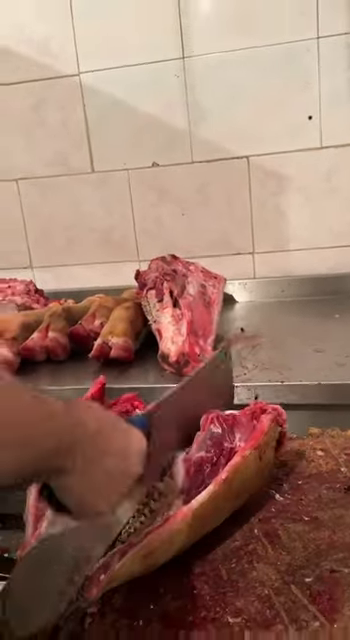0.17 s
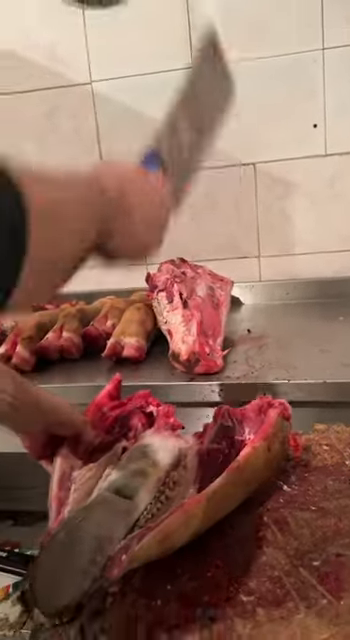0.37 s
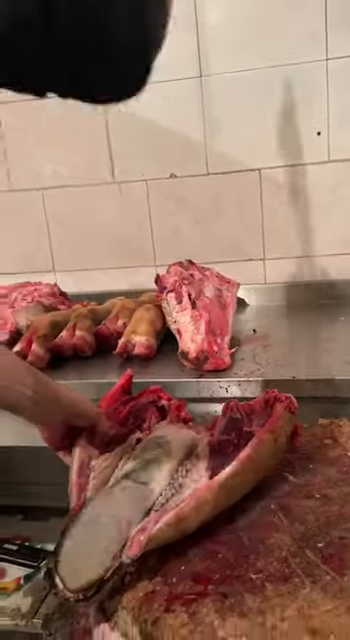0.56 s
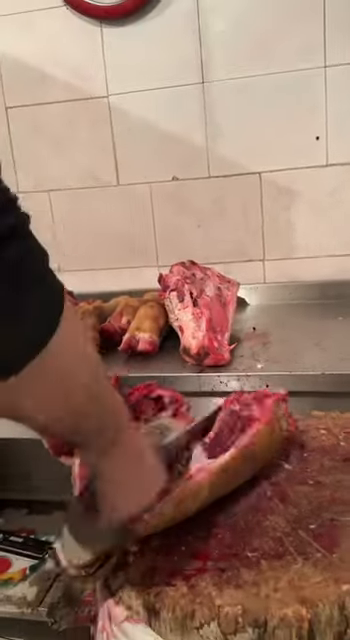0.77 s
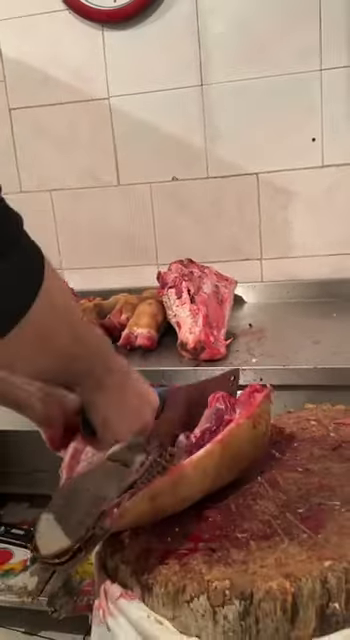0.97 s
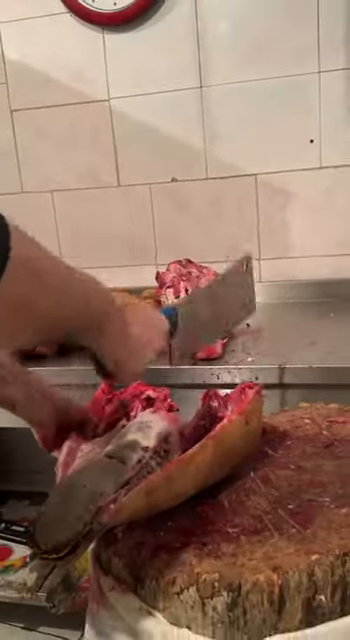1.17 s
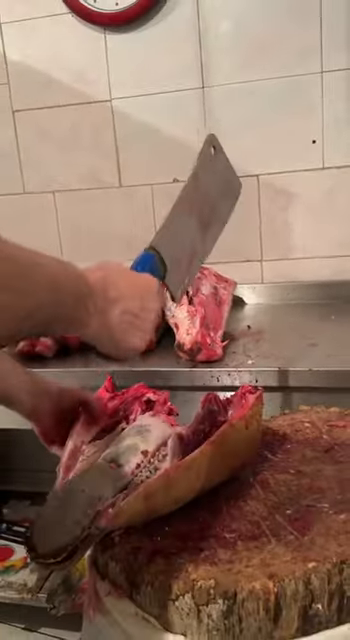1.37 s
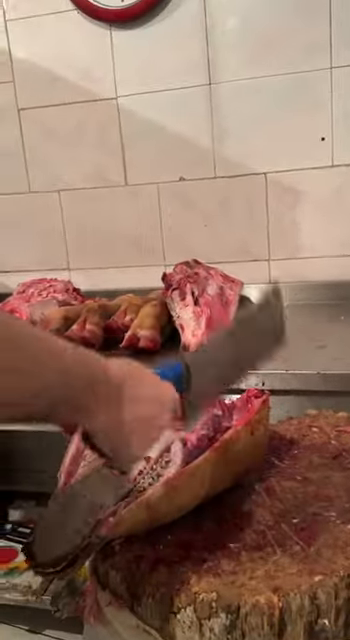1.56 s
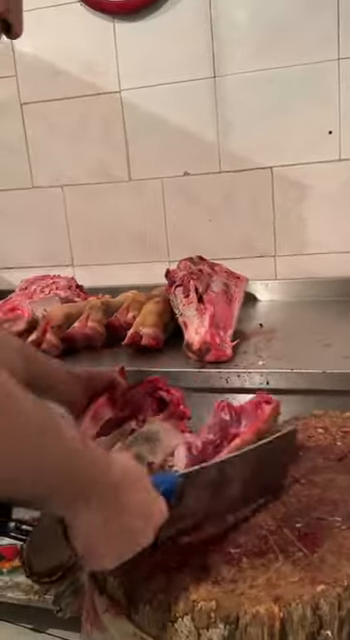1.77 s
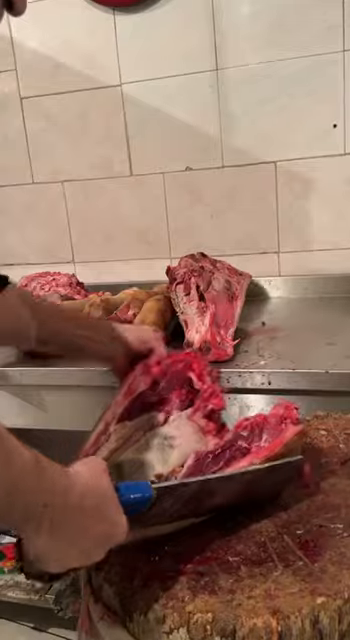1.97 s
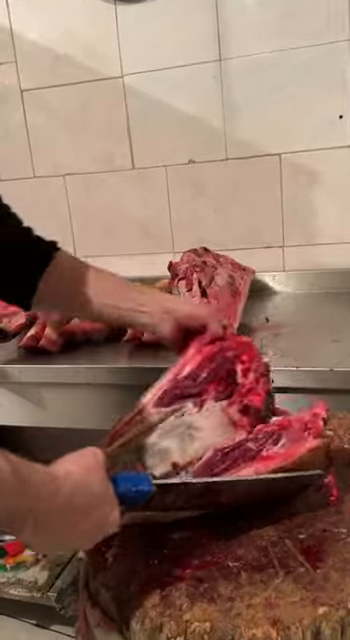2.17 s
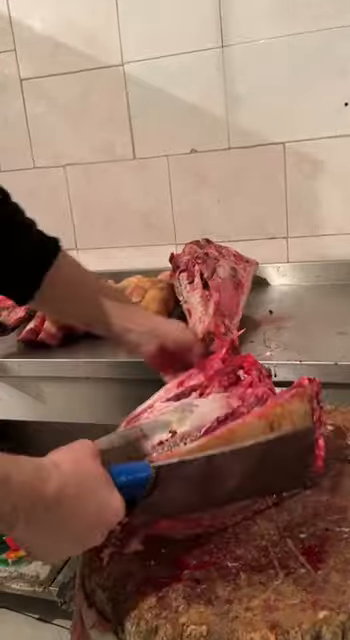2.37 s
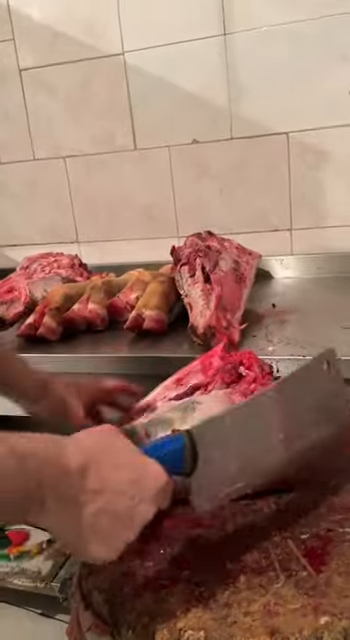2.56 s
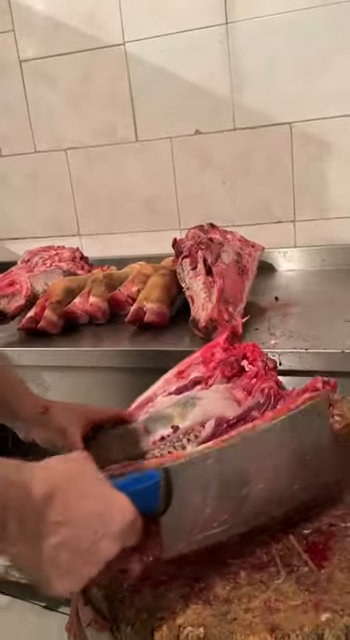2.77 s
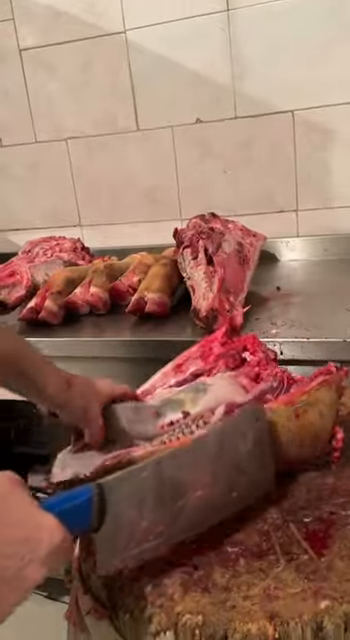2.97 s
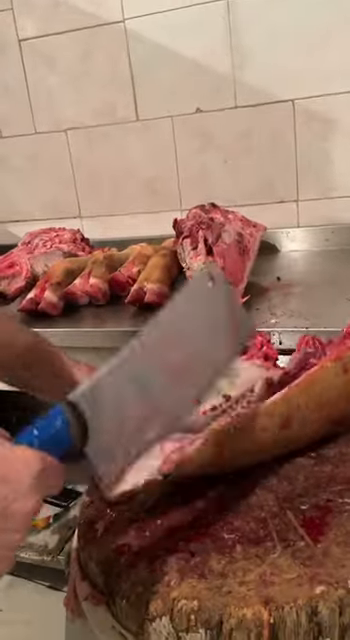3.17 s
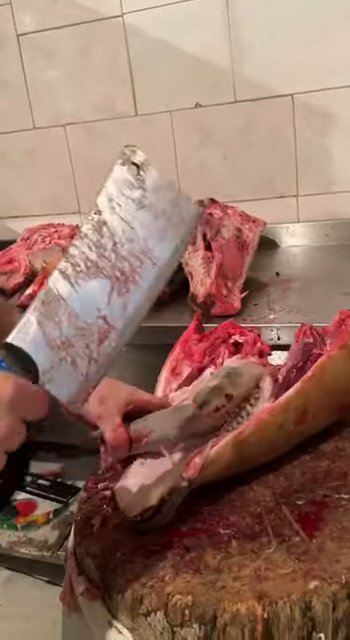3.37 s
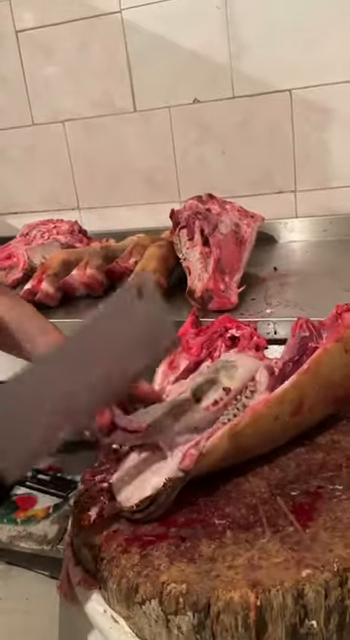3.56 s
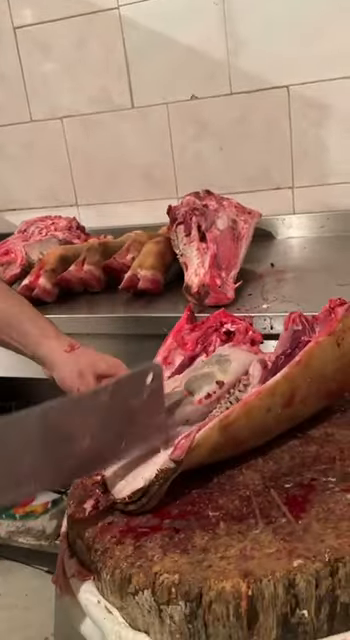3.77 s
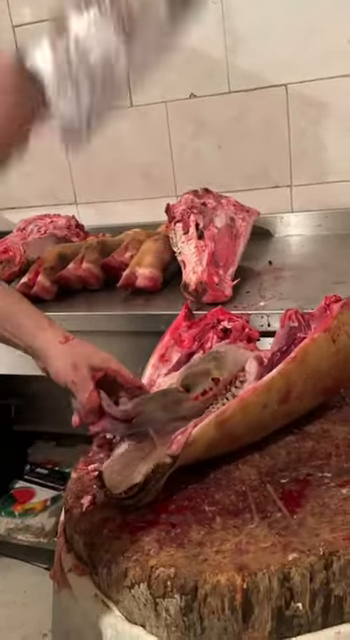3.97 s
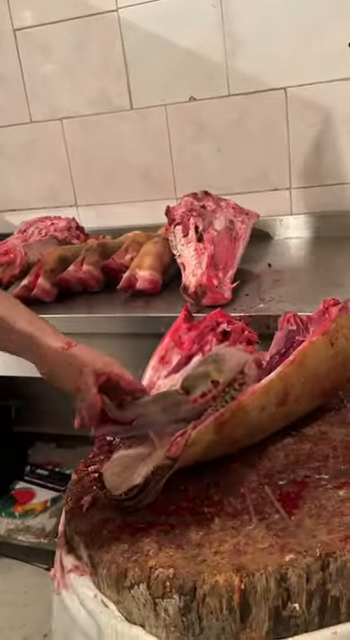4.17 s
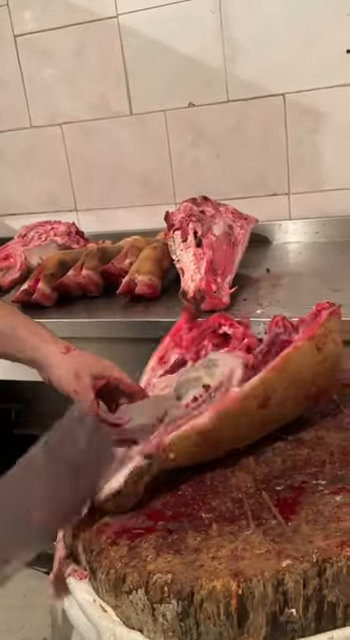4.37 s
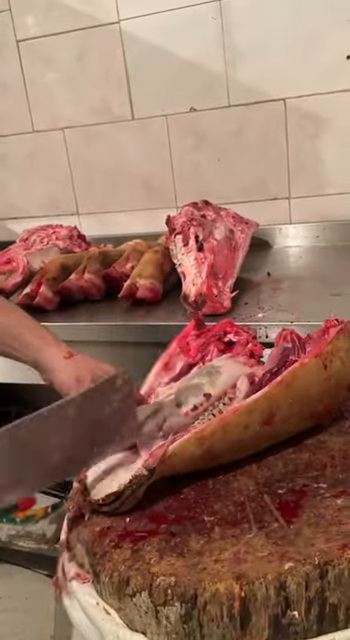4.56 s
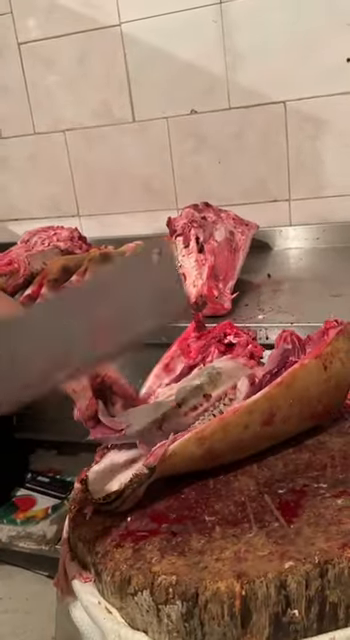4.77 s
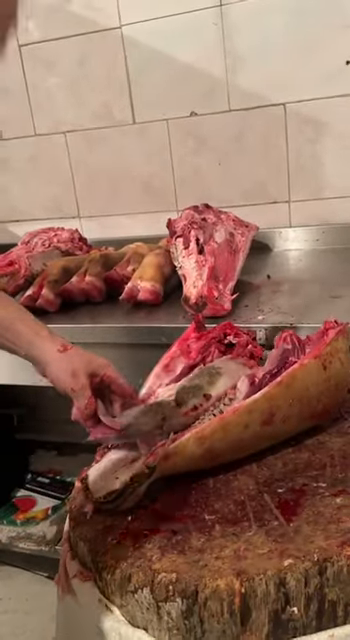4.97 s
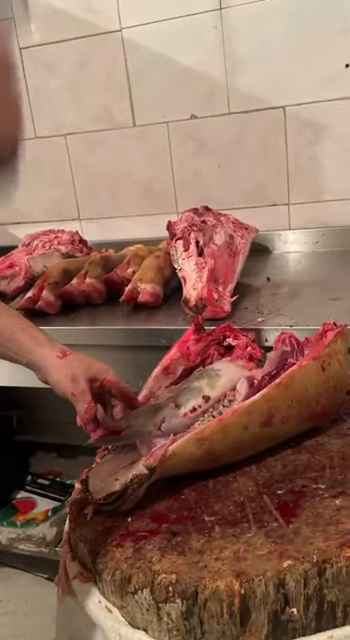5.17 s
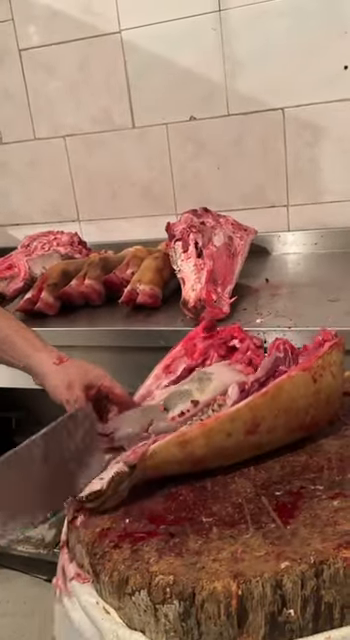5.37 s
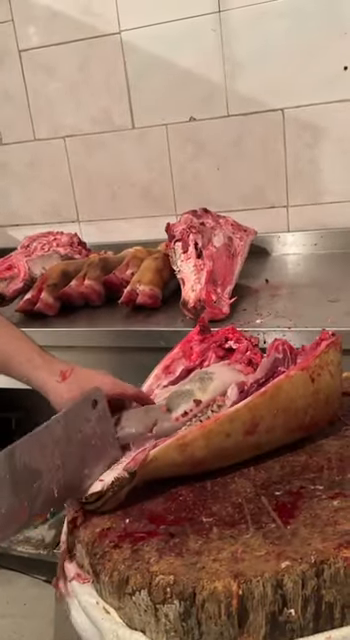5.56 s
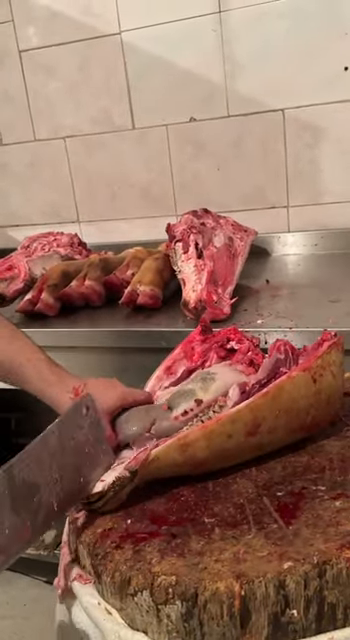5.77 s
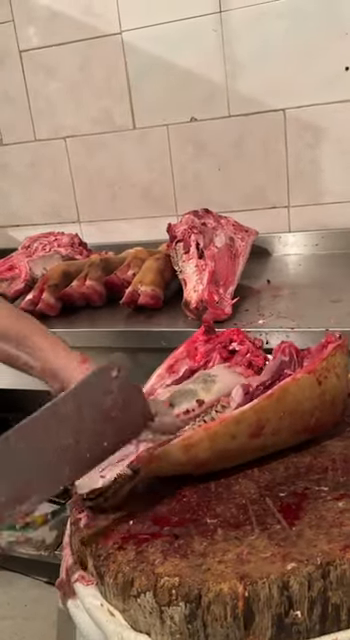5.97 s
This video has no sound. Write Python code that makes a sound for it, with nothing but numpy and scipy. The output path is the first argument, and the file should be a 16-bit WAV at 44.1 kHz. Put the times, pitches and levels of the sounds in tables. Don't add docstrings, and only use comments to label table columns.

```python
import sys
import numpy as np
from scipy import signal
from scipy.fft import rfft, irfft, next_fast_len
from scipy.io import wavfile
from scipy.ndimage import uniform_filter1d, map_coordinates

SR = 44100
rng = np.random.default_rng(int(sys.argv[2]) if len(sys.argv) > 2 else 0)


def volts_from_db(level):
    exponent = np.asarray(level, float) / 20
    return 10 ** exponent


def materialize(psi):
    bounded = np.clip(np.atleast_2d(psi).T, -1, 1)
    quanta = np.round(bounded * 32767).astype(np.int16)
    wavfile.write(sys.argv[1], SR, quanta)


N = 265482

# (time [s], peak level [dB],
# ring [Hz], second ring [Hz], t60 [s])
BONE_CONTACTS = [(.0869, -4.5, 2480, 6840, .01), (0.0862, -3.5, 3550, 5500, .015),
                 (.0881, -9.5, 940, 4300, .025), (0.099, -16, 1260, 3260, .05),
                 (.7696, -5, 1230, 2500, .027), (0.7701, 0.5, 1576, 5320, .018),
                 (.7707, -5.5, 2880, 7100, .013), (.787, -16.5, 2830, 5130, .037),
                 (3.6666, -12, 1645, 6090, 0.018), (3.6672, -14.5, 2400, 4790, .021),
                 (3.6673, -8, 952, 7320, .014), (3.667, -14, 9300, 11200, .013),
                 (4.34, -0.5, 2500, 5100, .0065), (4.3404, -21, 3190, 1500, .026),
                 (4.3449, -15, 1020, 3570, .012), (4.3486, -15, 1540, 5570, .0077),
                 (5.2459, -3, 2842, 5180, .018), (5.246, -6.5, 1668, 1090, .021),
                 (5.2536, -19.5, 905, 4040, .0084), (5.2545, -3.5, 1780, 9600, .021)]
# (time [s], room answer [dB], thud [dB], ring [dB], delay until the edge stops [s])
BLOWS = [
    (0.0864, -30.5, -20.5, -27, 0.0026),
    (.770, -22, -19.5, -25.5, .004),
    (3.667, -37, -15.5, -37.5, 0.0034),
    (4.341, -16.5, -20.5, -18, .008),
    (5.246, -14.5, -11.5, -18.5, .0071),
]
# (time [s], peak level [dB], pitch [Hz], room relative to tick [dB])
MEAT_TICKS = [(1.169, -33, 8600, -15), (1.7412, -30, 4370, -13), (1.741, -38, 1500, -4),
              (1.8065, -35, 7000, -14), (1.8065, -34, 11100, -20), (1.8285, -35, 950, -9),
              (1.8281, -28.5, 6000, -15), (1.828, -36, 2410, -8), (1.887, -42.5, 2500, 1),
              (2.0217, -11.5, 5630, -21.5), (2.0226, -25, 4200, -17), (2.028, -28, 6230, -19),
              (2.0445, -29, 5100, -20), (2.112, -39, 9050, -10), (2.148, -39, 4300, -3),
              (2.178, -42.5, 4550, -0.5), (2.206, -35, 4200, -11), (2.313, -40, 4020, -2),
              (2.363, -32, 10400, -18), (2.377, -32, 6500, -16), (2.388, -39, 5940, -15),
              (2.7977, -32.5, 5450, -6.5), (2.8625, -36, 6760, -10), (3.281, -35, 5600, -4.5),
              (3.433, -36, 5100, -5)]
# (time [s], table jolt [dB], gain dip [dB], gain hold [s], skull note [Hz])
HARDEST_BLOWS = [
    (4.354, -13.5, -9, 0.14, 1573),
    (5.252, -6.5, -16.5, 1.2, 1610),
]


def unit(x):
    return x / np.sqrt(np.mean(x ** 2) + 1e-20)


def along(points, hz):
    f, v = np.transpose(points)
    return np.interp(np.log(hz + 1), np.log(f + 1), v)


def wobble(rate_hz):
    knots = rng.standard_normal(int(N * rate_hz / SR) + 4)
    return map_coordinates(knots, [np.arange(N) * rate_hz / SR])


def filtered(x, response):
    m = next_fast_len(x.shape[-1] + 8192)
    spectrum = rfft(x, m) * response(np.fft.rfftfreq(m, 1 / SR))
    return irfft(spectrum, m)[..., :x.shape[-1]]


def resonances(modes):
    return lambda f: sum(volts_from_db(db) * 1j * f * w / (c * c - f * f + 1j * f * w) for c, w, db in modes)


def diffuse(pair, response):
    # (frequency [Hz], left-right correlation [0-1])
    likeness = [(60, .9995), (200, 1), (350, 0.99), (640, 0.66), (1160, 0.4), (2090, .65), (3780, 0.37),
                (5500, 0.28), (6000, 1), (12000, 0.98)]
    turn = lambda hz: np.arccos(np.clip(along(likeness, hz), -1, 1)) / 2
    mid, side = filtered(pair, lambda hz: response(hz) * [np.cos(turn(hz)), np.sin(turn(hz))])
    return unit(np.array([mid + side, mid - side]))


def add(track, s, sound):
    part = track[..., round(s * SR):][..., :sound.shape[-1]]
    part += sound[..., :part.shape[-1]]


def ring(hz, t60, t, attack):
    return np.sin(2 * np.pi * hz * t) * volts_from_db(-60 * t / t60) * (1 - np.exp(-t / attack))


def walls(response, t60_share, rise):
    # (frequency [Hz], t60 [s])
    room_t60 = [(300, 0.49), (1000, 0.61), (3000, 0.61), (6000, 0.56), (11000, 0.64)]
    t = np.arange(SR) / SR
    hz, frames_s, z = signal.stft(diffuse(rng.standard_normal((2, SR)), response), SR, nperseg=256)
    decay = volts_from_db(-60 * frames_s / (t60_share * along(room_t60, hz)[:, None]))
    tail = signal.istft(z * decay, SR, nperseg=256)[1][:, :SR]
    echoes_db = 2.4 * map_coordinates(rng.standard_normal(400), [260 * t]) * np.exp(-t / .12)
    return tail * volts_from_db(echoes_db) * (1 - np.exp(-t / rise))


def thud(t, cushion_db):
    # (frequency [Hz], level [dB], t60 [s])
    block_modes = [(62.3, -7.5, 0.14), (106.7, -4.5, 0.23), (207, 5, 0.061), (398.6, -1, 0.059),
                   (537, 1.5, 0.039)]
    out = np.zeros(len(t))
    for hz, db, t60 in block_modes:
        mode_db = db - cushion_db * np.log2(hz / 200) + rng.normal(0, 1.5)
        out += volts_from_db(mode_db) * ring(hz, t60, t, attack=0.0041)
    return out


def machines():
    # (frequency [Hz], density [dB per Hz])
    fan_colour = [(13, -47), (25, -19), (44, -4), (122, -7.5), (250, -9), (500, -11), (714, -15.5),
                  (900, -20.5), (1750, -26), (1950, -29.5), (4600, -36.5), (5500, -36.5), (8520, -38),
                  (10500, -44.5), (12500, -41.5)]
    # (frequency [Hz], width [Hz], level [dB])
    compressor_tones = [(56.3, 9.1, -45.5), (153.5, 18, -47.5), (197.33, 6, -44.5), (215.3, 3.3, -45.5),
                        (319.5, 5, -46.5), (391.8, 6.1, -56.5), (474.3, 7.5, -53.5), (601.3, 18, -54),
                        (694.3, 20, -57)]
    fan = diffuse(rng.standard_normal((2, N)), lambda hz: volts_from_db(along(fan_colour, hz)))
    air = volts_from_db(-38 + 0.4 * wobble(4)) * fan
    for hz, width_hz, db in compressor_tones:
        band = resonances([(hz, width_hz, 0)])
        tone = diffuse(rng.standard_normal((2, N)), lambda f: band(f) ** 2)
        air += volts_from_db(db + 1.6 * wobble(3.59)) * tone
    return air


def slices():
    # (start [s], end [s], level [dB], centre [Hz])
    flesh_cuts = [
        (.0778, .0872, -32, 3300),
        (.7615, .771, -27, 2700),
        (4.3365, 4.341, -34, 2200),
        (5.239, 5.247, -33, 4200),
    ]
    near, t = np.zeros((2, N)), np.arange(SR // 20) / SR
    for start, end, db, hz in flesh_cuts:
        band = resonances([(hz, 1.6 * hz, 0)])
        hiss = unit(filtered(rng.standard_normal(len(t)), lambda f: band(f) ** 2))
        add(near, start, volts_from_db(db) * (t < end - start) * hiss)
    return near


def contacts():
    near, t = np.zeros((2, N)), np.arange(SR // 20) / SR
    for s, db, low_hz, high_hz, t60 in BONE_CONTACTS:
        crack_db = -6.5 - 5.5 * np.log2(t60 / .012) - db
        splinters = rng.standard_normal((3, len(t)))
        rough = 1 + 1.1 * uniform_filter1d(splinters[2], size=14)
        crack = filtered(splinters, resonances([(high_hz, 1.8 * high_hz, 2)]))
        crack *= volts_from_db(-60 * t / (.8 * t60)) * (1 - np.exp(-t / 4e-4))
        body = ring(low_hz, t60, t, attack=7e-4) * rough
        high_ring = ring(high_hz, 0.73 * t60, t, attack=0.0003) * rough
        body += volts_from_db(crack_db) * (high_ring + 0.79 * crack[0])
        side = volts_from_db(crack_db - 12.5) * np.outer([1, -1], crack[1])
        add(near, s, volts_from_db(db - 2.5) * (body + side))
    return near


def chops():
    # (frequency [Hz], density [dB per Hz])
    colours = [
        [(290, -28.5), (500, 9), (1230, 1.5), (1530, -8), (3630, 1.5), (4610, -22.5), (5400, -4), (9570, -11),
         (10400, -42), (12000, -39)],
        [(290, -43), (500, -9.5), (886, -9), (1230, -4), (2100, -14), (2500, -11.5), (4430, -14), (7530, -12),
         (9200, -10.5), (12000, -40.5)],
        [(410, -21), (700, 4), (1500, -5.5), (1690, -3), (1920, -11.5), (2490, -5), (3840, -10), (5600, -7.5),
         (7420, -12), (8650, -20.5), (11600, -15.5), (15100, -50.5)],
        [(290, -10), (500, -4.5), (818, -6), (1470, -7), (2250, -10.5), (3480, -9.5), (4670, -15.5),
         (7530, -18.5), (10200, -24.5), (12000, -90)],
        [(290, -47), (500, -7.5), (745, -5), (874, -25), (934, -6), (1630, -4.5), (2530, -10), (7340, -12),
         (10800, -27.5), (12000, -88.5)],
    ]
    # (frequency [Hz], width [Hz], level [dB])
    blade_modes = [
        [(1230, 75, -6.5), (2360, 52, -5.5), (2500, 230, -8), (3500, 47, 2), (5380, 160, 2), (5400, 37, -1),
         (7150, 100, 2.5), (8000, 45, 0.5), (8600, 61, -5.5), (9300, 120, -5.5)],
        [(1290, 590, -2), (2490, 160, -4), (2905, 56, -6.5), (5100, 190, -2), (6080, 77, -3), (6750, 37, -8.5),
         (6530, 32, -8), (7430, 180, -25), (8700, 50, -10.5), (8950, 66, -14.5)],
        [(2500, 110, -7), (6100, 95, -2), (7500, 150, 1.5), (8220, 99, -8), (8700, 33, -12.5),
         (9400, 140, -7.5), (11200, 43, -9)],
        [(1480, 140, -5.5), (3630, 45, -9), (6270, 56, -19)],
        [(1060, 56, -4.5), (1700, 140, -5), (3410, 74, -9.5), (5300, 61, -7), (7130, 80, -8.5)],
    ]
    cushions = [0.8, -0.5, 0.6, -0.7, 2.5]
    after, t = np.zeros((2, N)), np.arange(SR) / SR
    for blow, colour, modes, cushion_db in zip(BLOWS, colours, blade_modes, cushions):
        s, room_db, thud_db, ring_db, delay_s = blow
        answer = volts_from_db(room_db) * walls(lambda hz: volts_from_db(along(colour, hz)), t60_share=1.138, rise=0.00067)
        answer += volts_from_db(ring_db) * walls(resonances(modes), t60_share=0.78, rise=0.0062)
        add(after, s + delay_s, answer)
        add(after, s + .003, volts_from_db(thud_db) * thud(t, cushion_db))
    return after


def ticks():
    dry_t60_s, chip_hz = 0.004, 3150
    out, t = np.zeros((2, N)), np.arange(SR // 2) / SR
    for s, db, hz, room_db in MEAT_TICKS:
        t60 = dry_t60_s * np.minimum(1 + (chip_hz / hz) ** 8, 8.5)
        snap = ring(hz, t60, t, attack=0.00022) * (0.68 + 1.13 * rng.standard_normal(len(t)))
        add(out, s, volts_from_db(db + 3.0) * filtered(snap, resonances([(hz, 1.05 * hz, 0)])))
        echo = walls(resonances([(hz, .6 * hz, 0)]), t60_share=0.54, rise=0.002)
        add(out, s + 0.0044, volts_from_db(db + room_db - 9.0) * echo)
    return out


def rubbing():
    # (time [s], peak level [dB], swell per 20 dB [s], fade per 20 dB [s])
    hand_strokes = [
        (1.3, -54, .07, .17),
        (1.93, -56.5, .25, .45),
        (2.8, -62, .5, .5),
        (3.25, -60, .4, .7),
        (4.78, -57, .15, .5),
    ]
    # (frequency [Hz], density [dB per Hz])
    wet_colour = [(2000, -68.5), (4000, -0.5), (7000, 7.5), (10000, 8.5), (13000, -24.5)]
    # (time [s], peak level [dB], swell per 20 dB [s], fade per 20 dB [s], centre [Hz])
    blade_slide = (3.14, -51, .45, .45, 2100)
    now = np.arange(N) / SR

    def stroke(s, db, swell_s, fade_s):
        return volts_from_db(db - 20 * np.maximum((s - now) / swell_s, (now - s) / fade_s))

    grain = volts_from_db(2.2 * wobble(300) + 1.8 * wobble(25))
    slide_hz = blade_slide[-1]
    band = resonances([(slide_hz, 1.4 * slide_hz, 0)])
    drag = diffuse(grain * rng.standard_normal((2, N)), lambda f: band(f) ** 2)
    rustle = diffuse(grain * rng.standard_normal((2, N)), lambda hz: volts_from_db(along(wet_colour, hz)))
    return sum(stroke(*row) for row in hand_strokes) * rustle + stroke(*blade_slide[:-1]) * drag


def bumps():
    # (time [s], level [dB])
    settlings = [
        (1.745, -26),
        (2.32, -33),
        (2.38, -26.5),
    ]
    out, t = np.zeros((2, N)), np.arange(SR // 2) / SR
    for s, db in settlings:
        add(out, s, volts_from_db(db) * thud(t, cushion_db=2.5))
    return out


def jolts():
    skull_db, skull_width_hz = -36, 89
    after, t = np.zeros((2, N)), np.arange(SR) / SR
    for s, jolt_db, dip_db, _, hz in HARDEST_BLOWS:
        skull = walls(resonances([(hz, skull_width_hz, 0)]), t60_share=1.23, rise=.006)
        add(after, s, volts_from_db(skull_db - 1.01 * dip_db) * skull)
        add(after, s + 0.023, volts_from_db(jolt_db) * ring(11, 0.19, t, attack=.001))
    return after


def gain_db(t):
    rest_db, dip_s, recover_s, overshoot_db, settle_s = -0.93, .015, .14, -2, .12
    total_db = rest_db
    for s, _, db, hold_s, _ in HARDEST_BLOWS:
        shape = np.clip(np.minimum((t - s) / dip_s, 1 + (s + hold_s - t) / recover_s), 0, 1)
        total_db = total_db + shape * (db + overshoot_db * np.exp(-abs(t - s) / settle_s))
    return total_db


def clamp_db(t):
    # (start [s], end [s], level [dB])
    clamps = [
        (4.3512, 4.3608, -21),
        (5.2565, 5.267, -20),
    ]
    ramp_s = 0.00061
    return sum(db * np.clip(np.minimum(t - start, end - t) / ramp_s, 0, 1) for start, end, db in clamps)


def thinned(x):
    # (frequency [Hz], share silenced [0-1])
    holes = [(2500, 0), (3800, .03), (4600, .17), (5200, .025), (9000, .03), (10500, .1)]
    edge_hz, edge_hz_per_db, lowest_hz, highest_hz = 10960, 210.5, 9800, 12000
    blow_hz, hardest_hz = 12800, 11300
    loud_over_db, loss_hz_per_db = 6.5, 130
    hz, t, z = signal.stft(x, SR, nperseg=2048, noverlap=1536)

    def since(rows):
        return np.abs(t[:, None] - [row[0] for row in rows]).min(axis=1)

    def level_db(low_hz, high_hz):
        power = np.mean(abs(z[:, (hz > low_hz) & (hz < high_hz)]) ** 2, axis=(0, 1))
        return 10 * np.log10(uniform_filter1d(power, size=5) + 1e-20)

    calm = since([row for row in BONE_CONTACTS + MEAT_TICKS if row[1] > -25]) > .028
    bright_db = level_db(9500, 11500) - level_db(600, 6000)
    loud_db = level_db(3000, 9500)
    loss_hz = loss_hz_per_db * np.maximum(loud_db - np.median(loud_db) - loud_over_db, 0)
    edge = edge_hz + edge_hz_per_db * (bright_db - np.median(bright_db)) - loss_hz
    edge = np.clip(edge, lowest_hz, highest_hz)
    struck = np.where(since(HARDEST_BLOWS) < .05, hardest_hz, blow_hz)
    edge = np.where(since(BLOWS) < .022, struck, edge)
    ragged_hz = np.repeat(rng.normal(0, 300, len(t)), 3)[:len(t)]
    kept = hz[:, None] < edge + calm * ragged_hz
    patches = np.kron(rng.random((len(hz) // 7 + 1, len(t) // 4 + 1)), np.ones((7, 4)))
    kept &= patches[:len(hz), :len(t)] > along(holes, hz)[:, None] * calm
    return signal.istft(z * kept, SR, nperseg=2048, noverlap=1536)[1][:, :N]


def scene():
    return machines() + slices() + contacts() + chops() + ticks() + rubbing() + bumps() + jolts()


def top_cut(x):
    return signal.sosfilt(signal.butter(12, 12960, fs=SR, output="sos"), x)


def record(dry):
    # (frequency [Hz], level [dB])
    port_response = [(20, 0), (10500, 0.5), (12000, -11.5), (13000, -19), (22000, -60)]
    t = np.arange(N) / SR
    clamp = clamp_db(t)
    bass = filtered(dry, lambda hz: 1 / (1 + (hz / 400) ** 4))
    heard = volts_from_db(gain_db(t)) * (bass * volts_from_db(.3 * clamp) + (dry - bass) * volts_from_db(clamp))
    mix = thinned(filtered(heard, lambda hz: volts_from_db(along(port_response, hz))))
    return top_cut(mix)


dry = scene()
out = record(dry)
materialize(out)
```